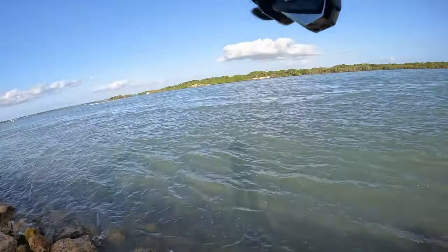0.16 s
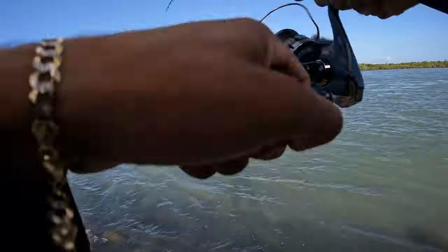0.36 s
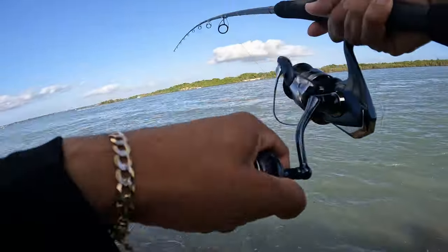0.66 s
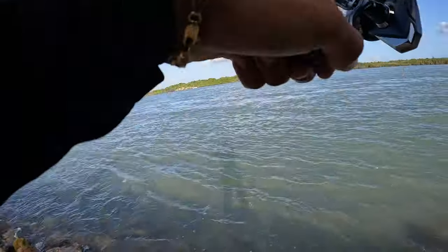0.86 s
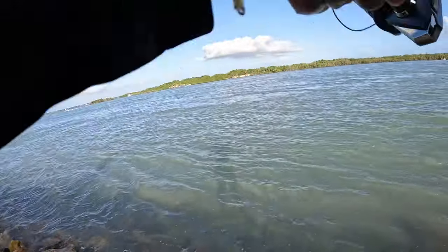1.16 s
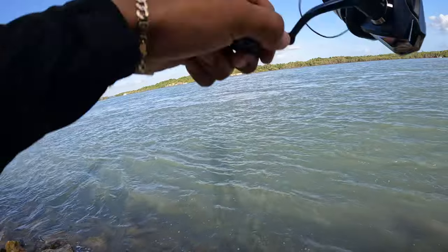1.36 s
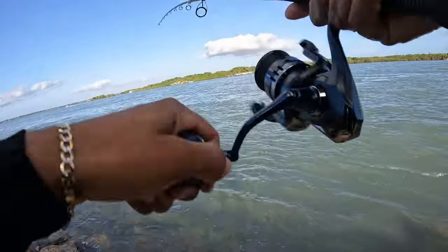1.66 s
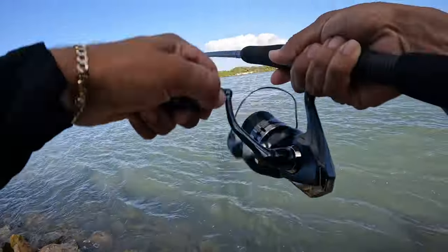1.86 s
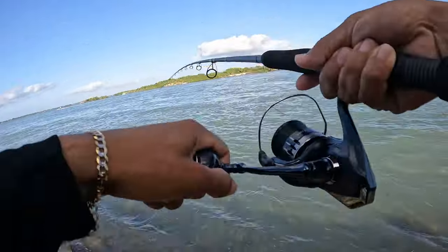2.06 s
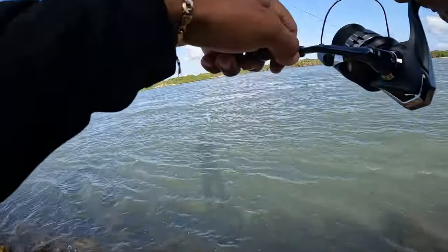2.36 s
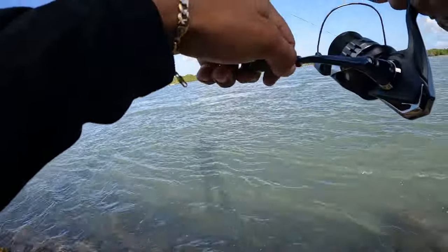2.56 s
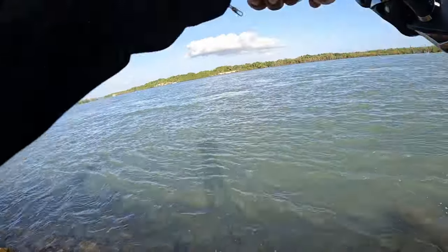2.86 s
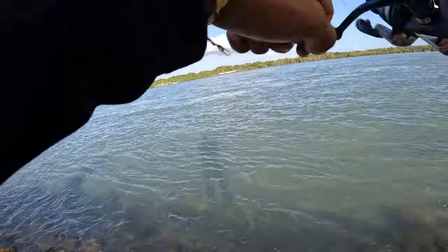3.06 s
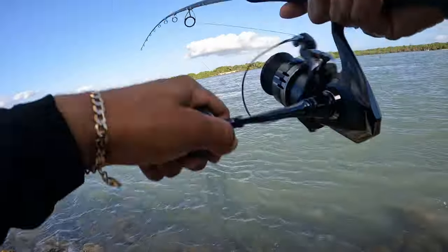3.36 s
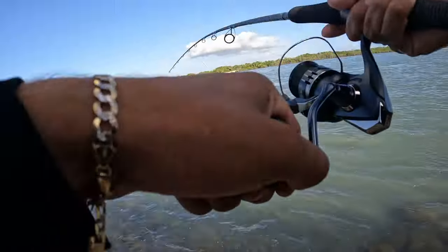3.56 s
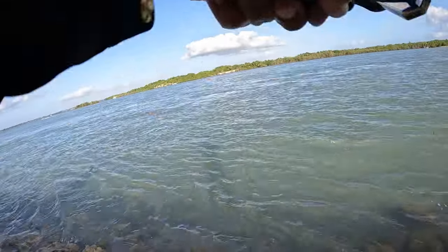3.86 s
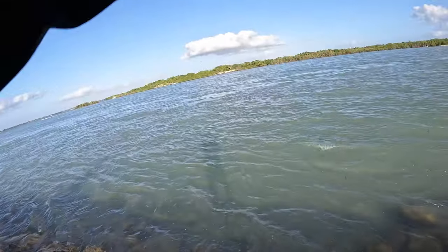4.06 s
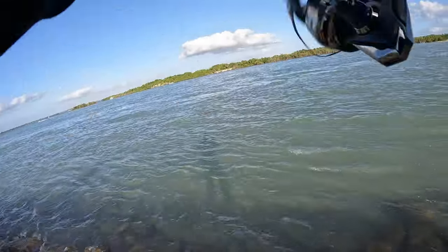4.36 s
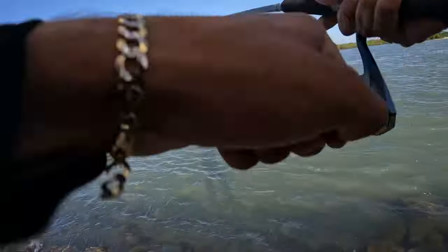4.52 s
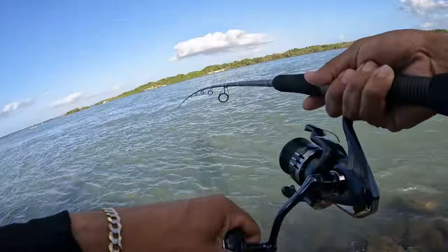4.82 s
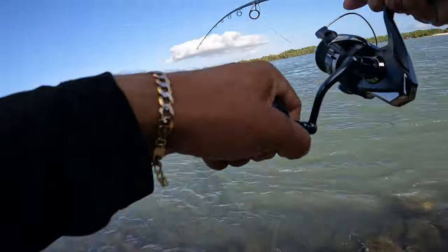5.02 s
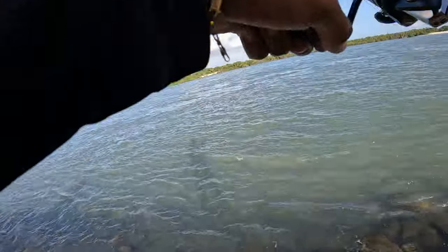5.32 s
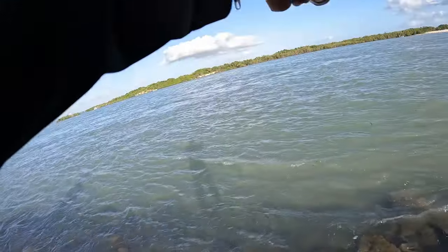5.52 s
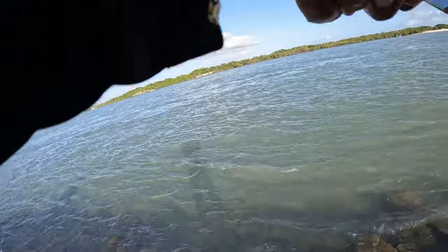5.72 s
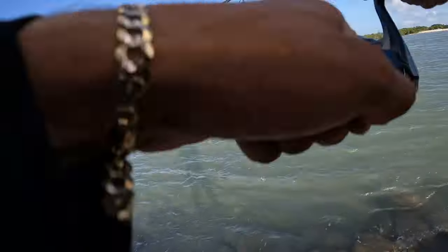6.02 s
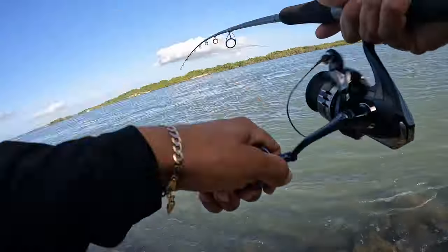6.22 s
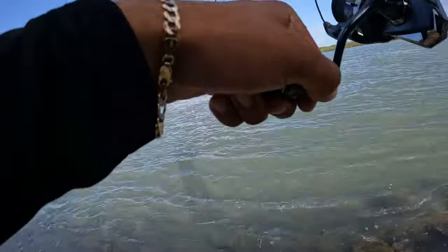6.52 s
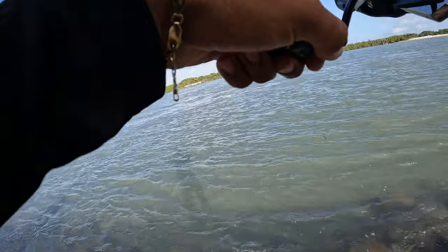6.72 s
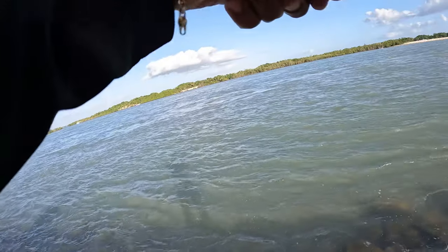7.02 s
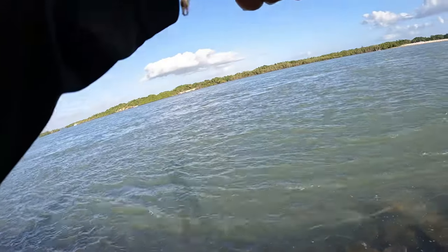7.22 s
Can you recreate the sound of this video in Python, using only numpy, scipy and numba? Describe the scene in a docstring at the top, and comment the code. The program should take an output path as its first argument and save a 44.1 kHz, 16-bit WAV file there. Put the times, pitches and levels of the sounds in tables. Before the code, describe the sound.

Water splashes and gurgles on rocks close by, then settles into a thinner wash. Over it, taut fishing line zings in five separate pulls, each about a second or less, raspy and unsteady in pitch, with pauses of only water between them. Sharp slaps on stone crowd the final second. Outdoors, dry and open, captured by a small microphone on the body, with low wind humming around its housing.

```python
"""Spinning reel on a rocky shore

An angler cranks a reel in bursts; the braided line whines as its weave runs over the guides: six
wavering partials through the response of the rod, over scraping noise. On the rocks below, wavelets
wash (flickering noise bands), fizz and gurgle (decaying sines), slap (short noise cracks) and glug
(low tones). Wind drones around the housing of a small body-worn microphone as shaped noise."""
import sys
import numpy as np
from scipy import signal
from scipy.fft import rfft, irfft
from scipy.io import wavfile
from scipy.ndimage import uniform_filter1d
from numba import njit

SR = 44100
rng = np.random.default_rng(int(sys.argv[2]) if len(sys.argv) > 2 else 0)


def generate_wav(sig):
    """Save sig (samples, or channels by samples) to the path in sys.argv[1] as 16-bit PCM at SR."""
    pcm = np.round(np.clip(np.atleast_2d(sig).T, -1, 1) * 32767).astype(np.int16)
    wavfile.write(sys.argv[1], SR, pcm)


N = 325458
T = np.arange(N) / SR  # seconds

# Line speed, one list per burst of cranking. Each row: time in seconds, weave rate in Hz.
CRANK_SPEEDS = [
    [(0.06, 1370), (0.11, 1710), (0.17, 1800), (0.212, 1868), (0.232, 1647), (0.296, 1804), (0.314, 2137),
     (0.354, 2432), (0.378, 2339), (0.424, 1882), (0.504, 1848), (0.532, 1702), (0.556, 1849), (0.58, 1638),
     (0.7, 1370)],
    [(1.17, 1480), (1.24, 1980), (1.272, 1800), (1.294, 2060), (1.316, 1908), (1.348, 2047), (1.365, 1860),
     (1.44, 2100), (1.508, 1952), (1.55, 1866), (1.578, 2040), (1.61, 1811), (1.632, 2000), (1.648, 1800),
     (1.68, 2107), (1.724, 2280), (1.756, 2289), (1.784, 1916), (1.81, 1989), (1.83, 1582), (1.864, 1720),
     (1.9, 1300), (1.925, 1220), (1.945, 1000), (2.04, 800)],
    [(3.04, 1205), (3.094, 1503), (3.122, 2085), (3.174, 2163), (3.2, 1930), (3.218, 1986), (3.24, 1679),
     (3.274, 1722), (3.3, 1433), (3.338, 1435), (3.36, 1199), (3.385, 1258), (3.41, 1469), (3.43, 1209),
     (3.476, 1289), (3.522, 835), (3.57, 760)],
    [(4.18, 1933), (4.286, 1829), (4.308, 1639), (4.36, 1721), (4.376, 1967), (4.42, 2086), (4.45, 1967),
     (4.476, 2220), (4.494, 2103), (4.52, 2560), (4.54, 2144), (4.556, 2286), (4.576, 1883), (4.61, 2012),
     (4.63, 1838), (4.662, 1793), (4.685, 1400), (4.712, 1240), (4.732, 1050), (4.77, 1030), (4.8, 900),
     (4.89, 960)],
    [(5.66, 1819), (5.77, 1930), (5.826, 1944), (5.84, 1787), (5.868, 1947), (5.9, 1616), (5.932, 1845),
     (5.955, 1735), (5.978, 2159), (6.005, 2123), (6.022, 2464), (6.036, 2191), (6.062, 2250),
     (6.078, 1940), (6.142, 1756), (6.158, 1942), (6.19, 1694), (6.21, 1745), (6.262, 1069), (6.296, 822),
     (6.37, 800)],
]
# Pull of each burst. Each row: load on the taut line in dB, trend in dB per second, time the hand
# eases off in seconds, boost of the second partial in dB, boost of the third in dB.
PULLS_PER_BURST = [(-17.5, -9, 0.64, 1.5, -3), (-19.5, -3, 1.9, -0.5, -2.5), (-14, -11.5, 3.485, 3.5, -2),
                   (-19, -1.5, 4.745, -1, 1), (-18, 0.5, 6.24, -1, -2)]
# Moments when the line's level jumps or dips briefly, if at all. Each row: time in seconds,
# level change in dB.
LINE_LEVEL_CHANGES = [(0.185, 5.5), (0.232, 9), (1.318, 2.5), (1.566, 4.5), (1.643, 9.5), (1.693, 6),
                      (1.806, 3), (3.12, 3.5), (3.17, 5), (3.326, 7), (3.38, 0), (4.382, 8), (4.458, 11),
                      (4.576, -1.5), (4.712, 4.5), (5.763, 6), (6.003, 2), (6.027, 4), (6.075, 1.5),
                      (6.218, 8.5)]
# Response of rod and guides. Each row: frequency in Hz, gain in dB.
GUIDE_RESPONSE = [(800, -24), (1400, -9.5), (1900, 0), (2600, -0.5), (3400, -3), (4300, -9), (5800, -11),
                  (8000, -32.5), (14000, -45)]
# The clearest slaps on rock. Each row: start in seconds, peak before the housing in dB, centre in Hz.
ROCK_SLAPS = [(0.0299, -10, 2060), (0.228, -2, 1740), (0.41, -2.5, 1870), (0.6883, -6, 1420),
              (0.8718, -7, 2720), (0.906, -10, 1300), (1.849, -15, 3460), (2.238, -11.5, 1860),
              (2.355, -15.5, 2060), (2.528, -18, 2500), (2.579, -18.5, 1980), (2.817, -15, 1810),
              (2.846, -11.5, 1950), (2.8717, -18, 3370), (2.899, -15.5, 1200), (3.627, -13, 1990),
              (3.647, -9.5, 1380), (3.733, -12.5, 1480), (4.061, -13.5, 1010), (4.125, -16, 1900),
              (4.2564, -21, 4600), (4.639, -11, 3970), (4.7287, -7.5, 3150), (4.8564, -11, 2050),
              (5.6062, -13, 3370), (6.145, -10.5, 4900), (6.3746, -13, 1270), (6.4544, -11, 3400),
              (6.8037, -6.5, 2080), (6.8187, -7.5, 1170), (6.993, -8, 1570), (7.008, -7, 1600),
              (7.1467, -10.5, 3000), (7.1905, -2, 3240), (7.214, -7.5, 3400), (7.27, -8.5, 1200),
              (7.3214, -1.5, 1360), (7.324, -4.5, 3520)]
# Water among the rocks. Each row: time in seconds, level of the wash in dB.
WASH_LEVEL = [(0.0, -27.5), (0.16, -25), (0.35, -22), (0.53, -18.5), (0.99, -25.5), (1.21, -28.5),
              (1.97, -29), (2.12, -36), (2.84, -36), (3.1, -29), (3.55, -30.5), (3.84, -33), (4.3, -30),
              (4.85, -32.5), (5.02, -34.5), (5.65, -28), (6.15, -31), (6.33, -27), (6.54, -32),
              (7.38, -25.5)]
# Tone colour of wash and grains. Each row: frequency in Hz, relative density in dB per Hz.
WASH_COLOUR = [(240, 13), (400, 5.5), (748, 2.5), (1030, 5.5), (1150, 7), (1380, 8.5), (1870, 10),
               (2390, 8.5), (3720, 6), (7390, -9.5), (9290, -20), (12600, -27), (15400, -44)]
# Air pockets closing under the rocks. Each row: start in seconds, peak in dB, starting pitch in Hz,
# ring (time to fall 60 dB) in seconds.
AIR_POCKETS = [(0.25, -15, 485, 0.044), (0.5, -20, 580, 0.055), (0.696, -15, 656, 0.096),
               (0.812, -13, 417, 0.066), (1.182, -17.5, 767, 0.088), (1.278, -18.5, 633, 0.1),
               (3.339, -7.5, 560, 0.013), (4.403, -17, 665, 0.032)]
# Bubble with a long upward sweep. Each row: start in seconds, peak in dB, pitch from in Hz,
# pitch to in Hz, length in seconds.
RISING_BUBBLES = [(0.502, -19, 496, 1760, 0.045)]
# Wind drone. Each row: time in seconds, level in dB.
WIND_LEVEL = [(0.0, -34), (0.39, -26.5), (0.66, -31.5), (0.86, -28.5), (1.13, -32.5), (1.42, -27),
              (1.5, -31.5), (3.62, -32), (6.0, -31.5), (7.38, -25.5)]
# Tone colour of the drone. Each row: frequency in Hz, relative density in dB per Hz.
DRONE_COLOUR = [(25, -38), (75, -19), (246, -4), (283, -0.5), (317, -2), (355, -16.5), (393, -13),
                (447, -19), (520, -15.5), (680, -17.5), (1140, -120)]
# Single eddies. Each row: start in seconds, peak of the envelope in dB, pitch in Hz.
WIND_BUFFETS = [(0.499, -29, 159), (1.874, -31, 71.6), (1.949, -27.5, 88.8), (3.338, -35, 90),
                (3.949, -36, 99), (6.229, -32, 165), (6.33, -19.5, 214), (7.279, -26.5, 138)]
# Tone colour of the side hiss. Each row: frequency in Hz, relative density in dB per Hz.
SIDE_COLOUR = [(30, 10), (2010, -19), (9360, -12.5), (12800, -1), (15400, -10)]


def undb(db):
    """Decibels to gain."""
    return 10 ** (np.asarray(db) / 20)


def unit(x):
    """Scale to rms 1."""
    return x / np.sqrt(np.mean(x ** 2))


def band(x, hz, width_hz):
    """Resonant band-pass, gain 1 at the centre."""
    return signal.lfilter(*signal.iirpeak(hz, hz / width_hz, fs=SR), x)


def walk(rate):
    """Random control signal: levels held 1 / rate s and smoothed twice, rms 1."""
    hold = max(int(SR / rate), 2)
    steps = np.repeat(rng.standard_normal(N // hold + 1), hold)
    return unit(uniform_filter1d(uniform_filter1d(steps, hold), hold)[:N])


def colour(x, table):
    """Shape a spectrum by (Hz, dB) points; 90 dB down outside them."""
    hz, db = np.transpose(table)
    f = np.maximum(np.arange(N // 2 + 1) * SR / N, 1)
    gain = undb(np.interp(np.log(f), np.log(hz), db, left=-90, right=-90))
    return irfft(rfft(x) * gain, N)


def add(out, s, sound):
    """Mix a short sound in at time s."""
    i = int(s * SR)
    out[i:i + len(sound)] += sound[:N - i]


@njit
def bubbles(start, hz, cycles, size, glide, n):
    """Each bubble is a decaying sine whose pitch rises as it dies."""
    out = np.zeros(n)
    for k in range(len(start)):
        phase, length = 0., cycles[k] * SR / hz[k]
        for i in range(min(int(5 * length), n - start[k])):
            phase += 2 * np.pi * hz[k] * (1 + glide * i / length) / SR
            out[start[k] + i] += size[k] * np.exp(-i / length) * np.sin(phase)
    return out


def line(change_s=0.012):
    """Weave bumps pass the guides at a rate set by line speed; every partial rings the rod and wavers."""
    partials = 6
    overtone_db = -2  # each partial is weaker than the one below
    slack_db, taut_s = -9.5, 0.36  # the line starts slack and tightens over this time
    eased_db, ease_s = -12.5, 0.032  # it coasts on, fainter, once the hand eases off
    drag_db_per_octave, cruise_hz = 3, 1900  # it rubs harder as it slows below cruising speed
    slip, steady, scrape_db = 0.021, 1.4, -7.0  # slip: spread of the rate as a fraction

    out = np.zeros(N)
    uneven = walk(150) + 0.7 * walk(400)
    # the guides drift in and out of step: size and phase
    grip = [0.8 * (walk(420) + 1j * walk(420)) for _ in range(partials)]
    # overtones come and go more
    patchy = [undb(2.4 * np.sqrt(k + 1) * walk(55)) for k in range(partials)]
    scrape = unit(colour(rng.standard_normal(N), GUIDE_RESPONSE)) * undb(walk(60))
    change_db = sum(db * np.exp(-((T - s) / change_s) ** 2) for s, db in LINE_LEVEL_CHANGES)
    ring_hz, ring_db = np.transpose(GUIDE_RESPONSE)

    for speeds, pull in zip(CRANK_SPEEDS, PULLS_PER_BURST):
        pull_db, trend_db, ease_at_s, second_db, third_db = pull
        s, hz = np.transpose(speeds)
        now = (T > s[0]) & (T < s[-1])
        t = T[now]
        fade = np.clip(np.minimum(t - s[0], s[-1] - t) / 0.066, 0, 1)
        rate = np.interp(t, s, hz)

        db = pull_db + trend_db * (t - s[0])
        db = db + slack_db * np.exp(-(t - s[0]) / taut_s)
        db = db + eased_db * np.clip((t - ease_at_s) / ease_s, 0, 1)
        db = db + drag_db_per_octave * np.maximum(np.log2(cruise_hz / rate), 0)

        rate = rate * (1 + slip * uneven[now])
        phase = 2 * np.pi * np.cumsum(rate) / SR
        # a slow line scrapes more against its singing
        tone = undb(scrape_db) * scrape[now] * cruise_hz / rate
        for k in range(partials):
            partial_db = np.interp(np.log((k + 1) * rate), np.log(ring_hz), ring_db)
            partial_db = partial_db + k * overtone_db + (k == 1) * second_db + (k == 2) * third_db
            waver = steady / np.sqrt(k + 1) + grip[k][now]
            partial = np.imag(waver * np.exp(1j * (k + 1) * phase))
            tone = tone + undb(partial_db) * patchy[k][now] * partial
        out[now] += fade * undb(db + change_db[now]) * tone
    return out


def slaps(decay_s=0.004, tail_s=0.02, tail_db=-16.0):
    """A wavelet hits rock: a broad crack around its own pitch and a short spatter."""
    out, t = np.zeros(N), T[:SR // 6]
    attack = 1 - np.exp(-t / 0.00072)
    shape = attack * (np.exp(-t / decay_s) + undb(tail_db) * np.exp(-t / tail_s))
    for s, db, hz in ROCK_SLAPS:
        noise = rng.standard_normal(len(t))
        pitched = band(band(noise, hz, 0.5 * hz), hz, 0.21 * hz)
        broad = band(band(noise, 2450.0, 2600.0), 2550.0, 5400.0)
        slap = shape * (3.8 * pitched + 0.93 * broad)
        add(out, s, undb(db) * slap / np.abs(slap).max())
    return out


def water(per_s=1500, fizz_db=-1.0, spatter_db=-7.5, gurgle_db=-9.5):
    """A wash of flickering bands under tiny bubbles, ticks of falling spray and low gurgles."""
    flow_db = np.interp(T, *np.transpose(WASH_LEVEL))
    swell_db, flicker_db = 2.3, 2.6  # spread shared by all bands, and of each band alone
    wash, swell = 0, walk(20)
    for hz in 420 * 2 ** np.arange(0, 5.3, 0.5):
        strip = unit(band(rng.standard_normal(N), hz, hz / 3)) * np.sqrt(hz)
        wash = wash + strip * undb(swell_db * swell + flicker_db * walk(25))
    layers = unit(colour(wash, WASH_COLOUR))

    rarest = 0.03  # limits the biggest grains
    drowned = 0.12  # dB the grains lose against the wash for each dB it rises
    # Each row: grains per second, lowest Hz, highest Hz, cycles of decay before scatter,
    # size scatter in dB, level against the wash in dB.
    kinds = (
        (per_s, 600, 12000, 4.0, 3.9, fizz_db),
        (150, 4000, 14500, 1.3, 4.6, spatter_db),
        (40, 330, 1100, 3.0, 3.0, gurgle_db),
    )
    for rate, low_hz, top_hz, cycles, scatter_db, db in kinds:
        when, pitch, rarity, ring = rng.random((int(rate * N / SR), 4)).T
        start = (when * N).astype(np.int64)
        hz = low_hz * (top_hz / low_hz) ** pitch
        size = np.sqrt(hz) * undb(-scatter_db * np.log(rarity + rarest))  # few big ones, many small
        grains = bubbles(start, hz, cycles * (0.72 + 3.29 * ring), size, 0.0947, N)
        grains = unit(colour(grains * undb(0.32 * walk(24)), WASH_COLOUR))
        layers = layers + undb(db - drowned * (flow_db - flow_db.mean())) * grains
    return undb(flow_db) * layers


def glugs():
    """Large bubbles: decaying low tones that rise a little; one sweeps far up as it reaches the surface."""
    out = np.zeros(N)
    for s, db, low_hz, top_hz, length_s in RISING_BUBBLES:
        u = T[:int(length_s * SR)] / length_s
        phase = 2 * np.pi * np.cumsum(low_hz + (top_hz - low_hz) * u) / SR
        add(out, s, undb(db) * np.sin(np.pi * u) * np.sin(phase))
    s, db, hz, ring_s = np.transpose(AIR_POCKETS)
    cycles = ring_s * hz / np.log(1000)  # 60 dB ring to cycles per decay constant
    return out + bubbles((s * SR).astype(np.int64), hz, cycles, undb(db), 0.0058, N)


def wind(decay_s=0.01):
    """Turbulence drones in the housing, wavering; single eddies thump on it as short low sines."""
    waver_db = 1.5
    turbulence = rng.standard_normal(N) * undb(waver_db * walk(6.5))
    out = unit(colour(turbulence, DRONE_COLOUR)) * undb(np.interp(T, *np.transpose(WIND_LEVEL)))
    t = T[:SR // 5]
    thump = np.e * t / decay_s * np.exp(-t / decay_s)  # peaks at 1
    for s, db, hz in WIND_BUFFETS:
        add(out, s, undb(db) * thump * np.sin(2 * np.pi * hz * t))
    return out


def side_hiss():
    """Faint shaped hiss, opposite in the two channels, that follows the water at 0.34 dB per dB."""
    s, wash_db = np.transpose(WASH_LEVEL)
    db = -65 + 0.34 * (np.interp(T, s, wash_db) - np.mean(wash_db))
    return undb(db) * unit(colour(rng.standard_normal(N), SIDE_COLOUR))


def scene():
    """Everything reaches one microphone port; only the faint hiss differs between the channels."""
    housing = signal.butter(4, 6500, fs=SR, output="sos")  # dulls line and slaps above 6500 Hz
    near = signal.sosfilt(housing, line() + slaps())
    mid = near + water() + glugs() + wind()
    side = side_hiss()
    return np.array([mid + side, mid - side])


def record(dry):
    """The port cavity cancels a narrow treble band; peaks are rounded; the top is cut."""
    notch_hz, notch_width_hz, top_hz = 9050, 1100, 15450
    notch = signal.iirnotch(notch_hz, notch_hz / notch_width_hz, fs=SR)
    rounded = 1.3 * np.tanh(signal.lfilter(*notch, dry) / 1.3)
    return signal.sosfilt(signal.ellip(8, 0.2, 70, top_hz, fs=SR, output="sos"), rounded)


dry = scene()
out = record(dry)
generate_wav(out)
```